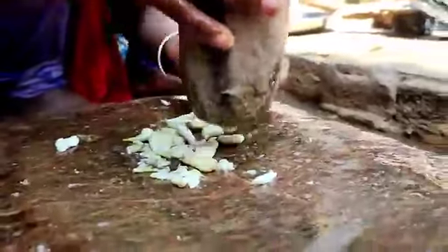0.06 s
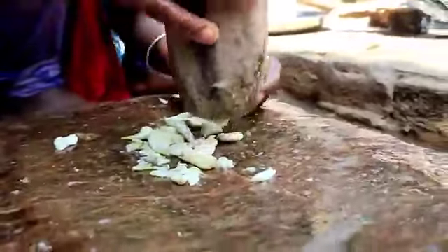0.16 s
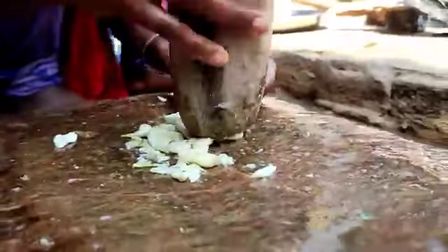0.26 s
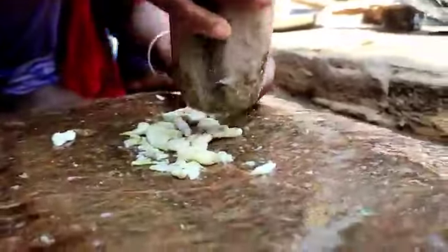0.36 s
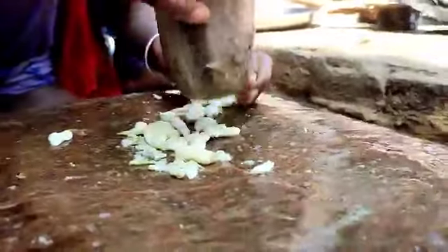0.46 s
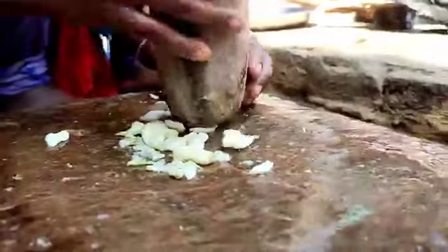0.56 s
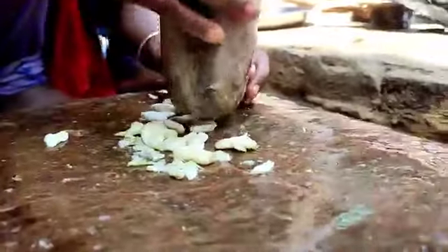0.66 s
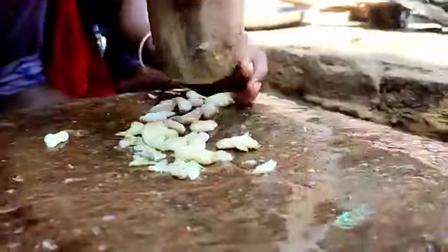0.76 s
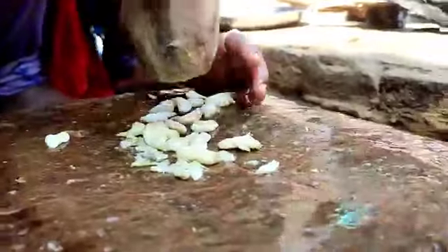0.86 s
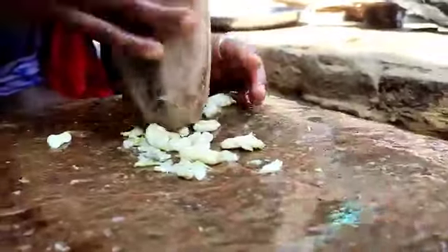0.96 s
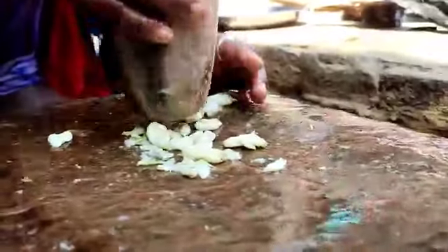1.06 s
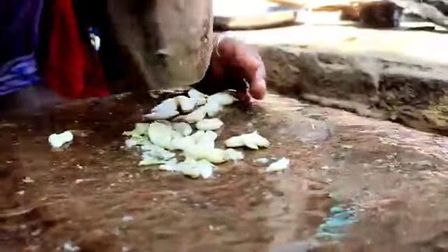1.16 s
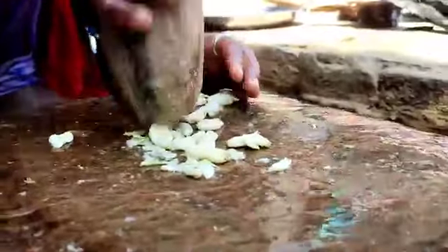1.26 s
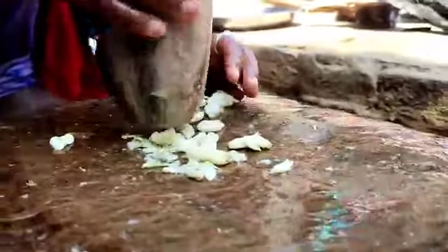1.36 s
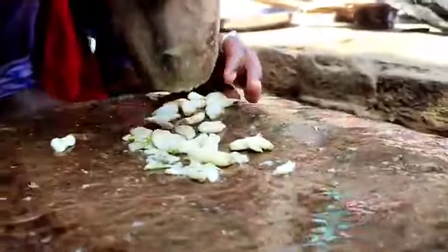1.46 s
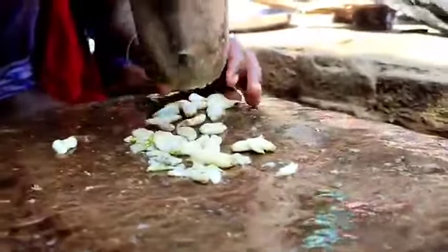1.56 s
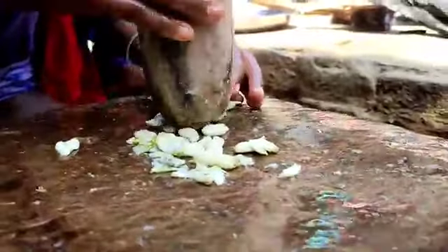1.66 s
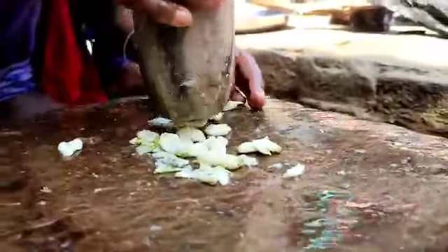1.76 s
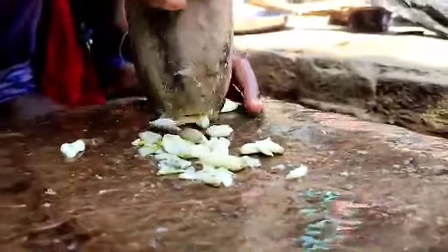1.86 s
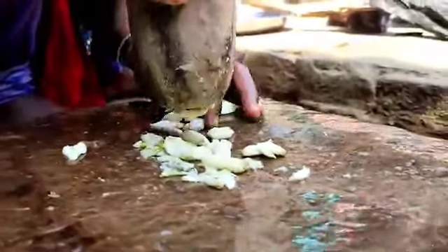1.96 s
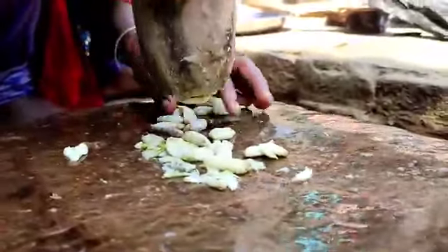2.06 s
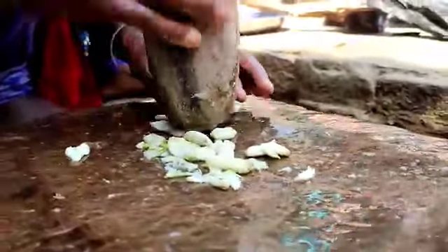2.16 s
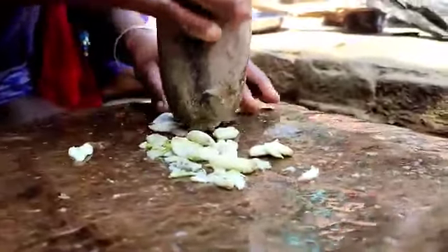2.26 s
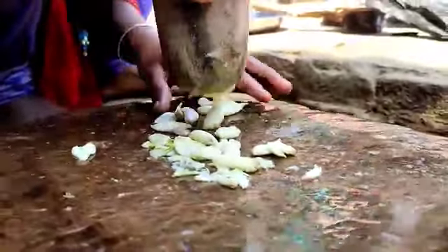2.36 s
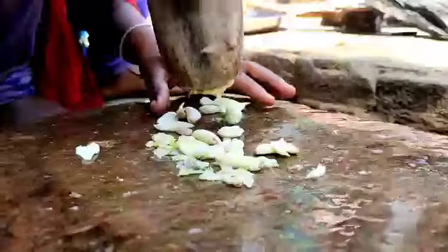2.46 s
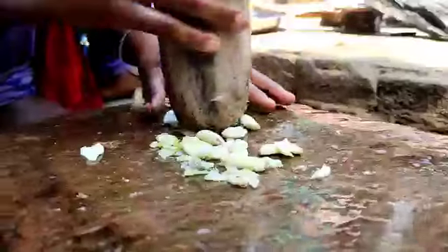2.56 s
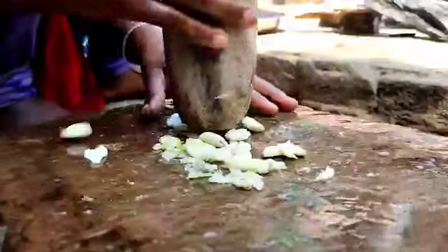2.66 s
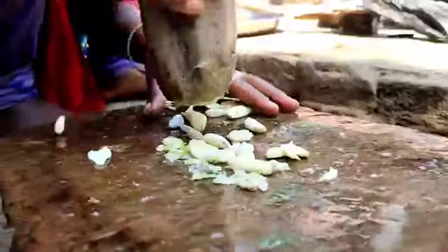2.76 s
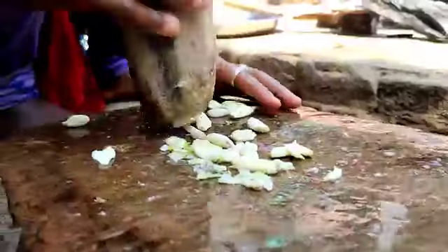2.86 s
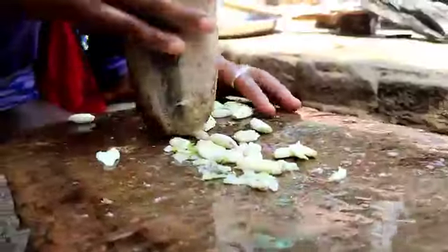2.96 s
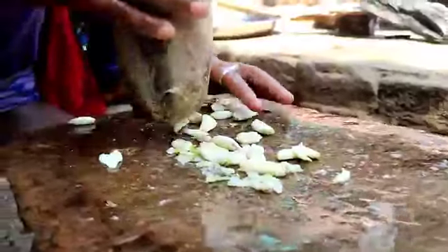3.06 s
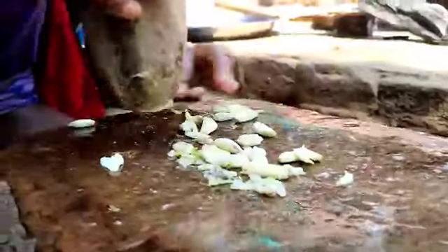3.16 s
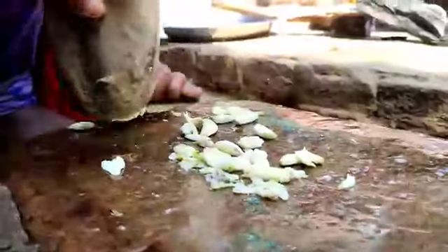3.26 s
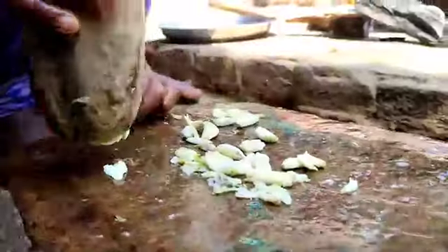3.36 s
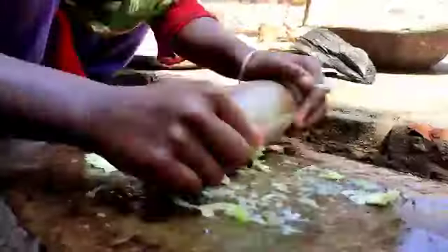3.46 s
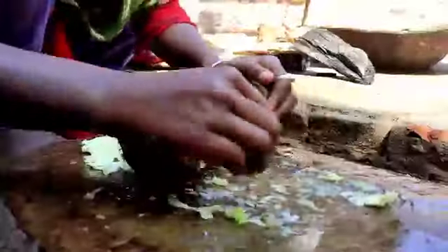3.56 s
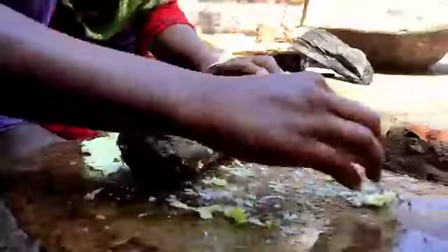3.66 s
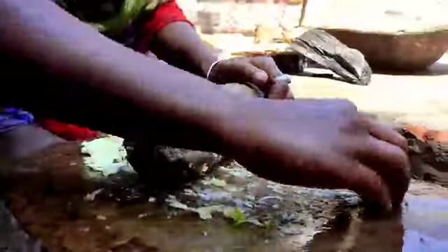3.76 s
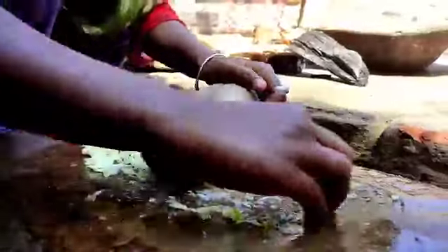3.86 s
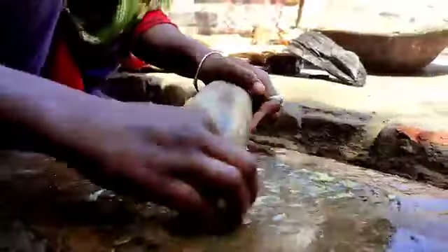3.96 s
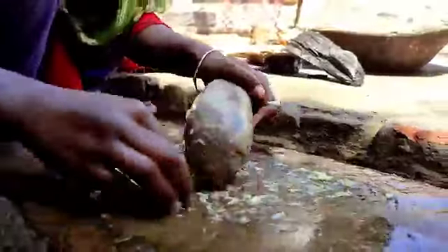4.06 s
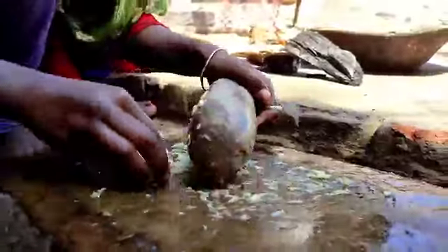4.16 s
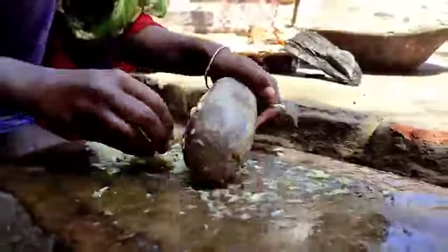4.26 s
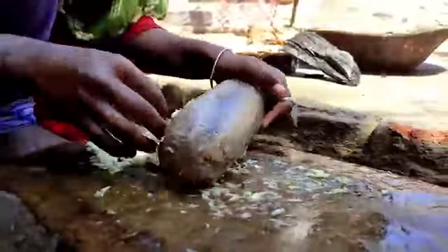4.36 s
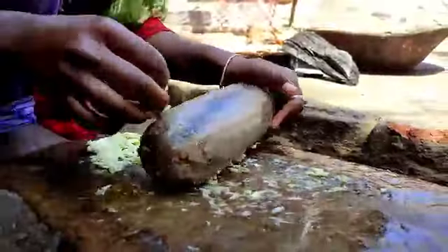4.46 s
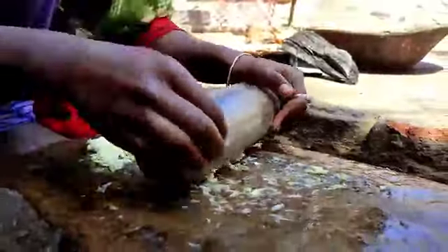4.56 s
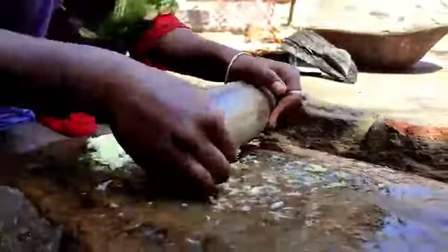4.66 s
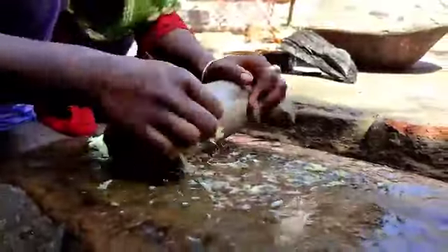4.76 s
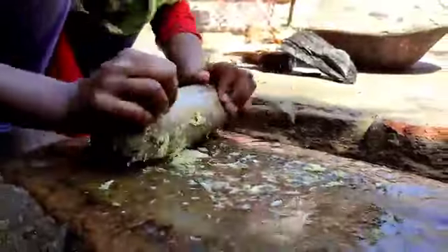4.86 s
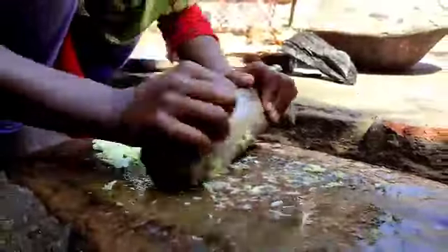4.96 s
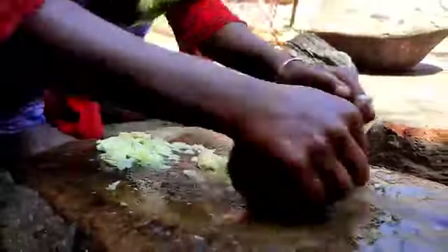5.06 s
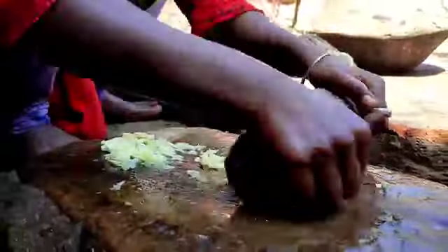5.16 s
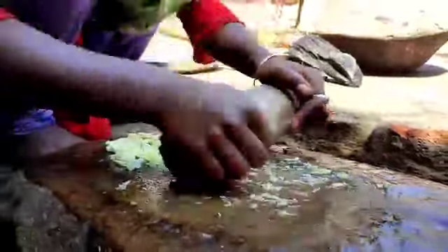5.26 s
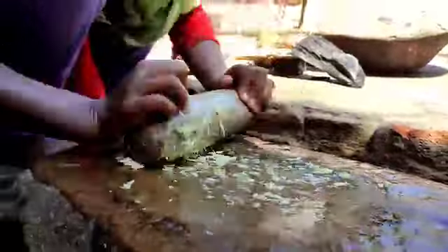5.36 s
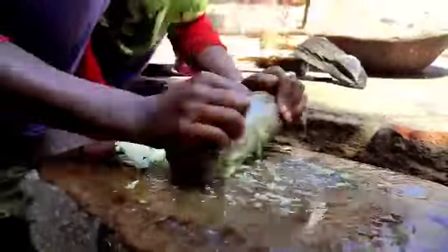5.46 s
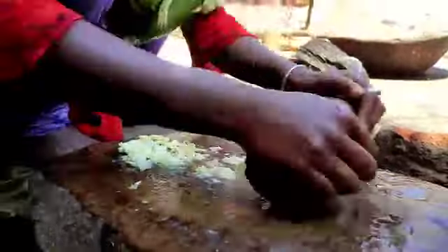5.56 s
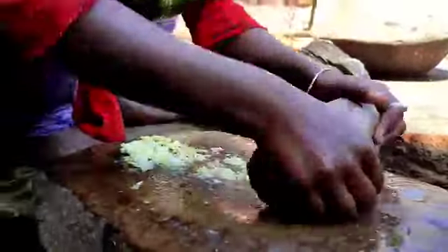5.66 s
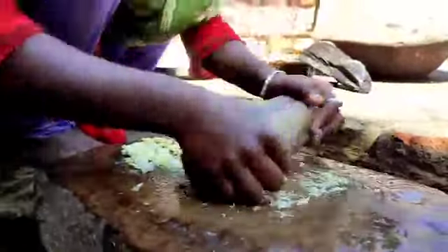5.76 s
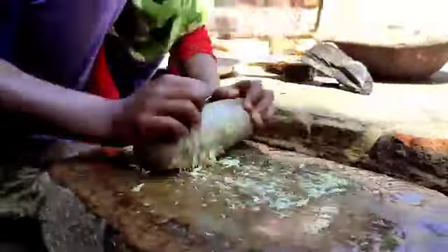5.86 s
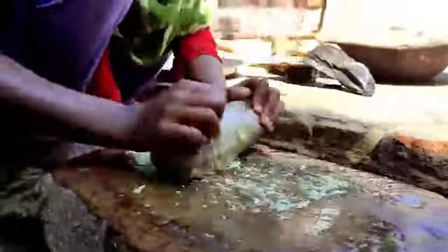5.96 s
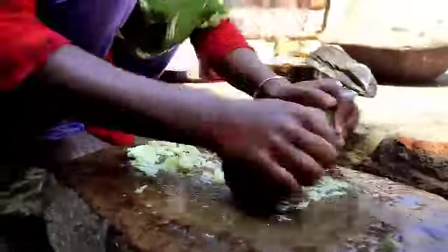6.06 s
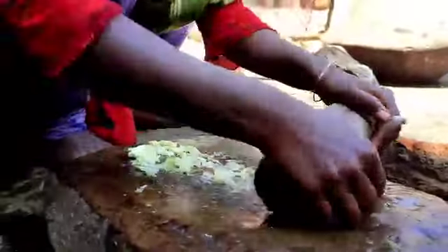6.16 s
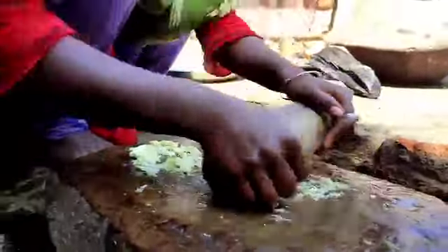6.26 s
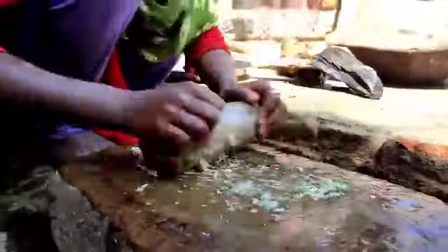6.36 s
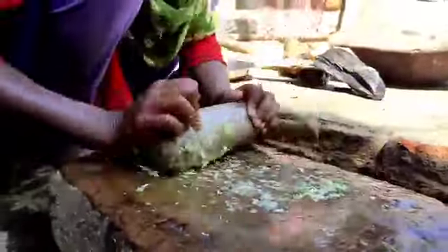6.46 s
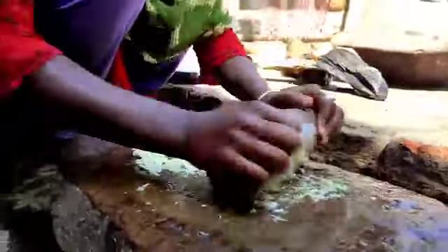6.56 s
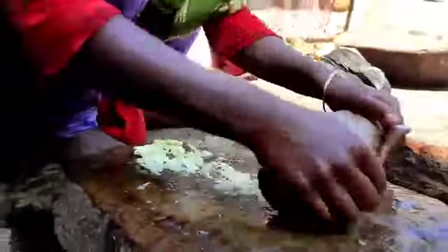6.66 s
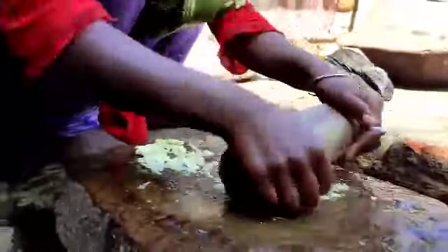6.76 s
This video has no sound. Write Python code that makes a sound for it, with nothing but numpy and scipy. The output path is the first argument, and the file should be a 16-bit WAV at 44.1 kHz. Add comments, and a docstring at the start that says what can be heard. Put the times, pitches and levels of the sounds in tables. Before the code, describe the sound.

In a half-open yard, a stone roller crushes garlic cloves on a stone slab, each blow a sharp husky crunch over a muffled low thump. Then grinding begins: quiet wet rubbing at first, a loud double stone clack, and regular gritty swishes with rattling knocks at each turn. Near stereo microphones, short reflections, faint air noise and one barely audible distant bird chirp.

```python
"""A low rumble of air, and at once garlic is pounded with the end of a stone roller on a wet stone slab:
nine blows, each a crackle of husk (bursts of tiny random fractures) and a dull thud (a push and a ring).
Then the roller is laid flat and pushed to and fro: filtered grains hiss over the wet paste, and
struck resonances knock as it rocks. The place is half open, with short reverberation and one far
bird, a falling tone. Two microphones hear the slab, the right one a few samples after the left."""
import sys
import numpy as np
from scipy import signal
from scipy.fft import rfft, irfft, next_fast_len
from scipy.io import wavfile
from scipy.ndimage import uniform_filter1d

SR = 44100
rng = np.random.default_rng(int(sys.argv[2]) if len(sys.argv) > 2 else 0)


def pcm_store(signal):
    """Save signal as 16-bit PCM."""
    levels = np.round(np.clip(np.atleast_2d(signal), -1, 1) * 32767)
    wavfile.write(sys.argv[1], SR, levels.astype(np.int16).T)


N = 300321
TIME = np.arange(N) / SR   # s

# Levels in the tables are relative: trims in the functions and the placing between microphones follow.

# Wash of the open air. Each row: frequency in Hz, relative level in dB per Hz.
AIR_WASH = [(59, -32.5), (169, -31.5), (242, -29), (357, -34), (674, -38), (1140, -43.5), (2220, -46),
            (8380, -56.5), (13800, -55.5), (15000, -78)]
# Low rumble of the air. Each row: frequency in Hz, relative level in dB per Hz.
AIR_RUMBLE_SPECTRUM = [(20, 5.5), (40, -13), (80, -10.5), (130, -23.5), (300, -37)]
# How that rumble comes and goes. Each row: time in seconds, level in dB before its trim.
AIR_RUMBLE_LEVEL = [(0.0, -59.5), (1.84, -65.5), (4.25, -68), (6.81, -66)]
AIR_WASH_DB = -69.5

# Blows on the cloves. Each row: time in seconds, squeeze time in seconds, crackle in dB, snap in dB,
# snap frequency in Hz, snap width in Hz, snap fizz in dB, time between the two snaps in ms,
# pulp squelch in dB, thud in dB, slab ring in dB, ring frequency in Hz.
BLOWS = [(0.0188, 0.0017, -27, -18.5, 7050, 447, -32, 0.72, -32, -50, -45.5, 148),
         (0.3457, 0.0028, -29.5, -14.5, 7120, 1090, -29, 5.6, -38, -49, -45.5, 137.4),
         (0.665, 0.0016, -25, -20, 7420, 714, -30.5, 1.8, -31.5, -43, -44, 144.6),
         (1.0895, 0.0018, -25.5, -20.5, 7190, 443, -10, 0.81, -36, -36, -35.5, 109.9),
         (1.4313, 0.0016, -24, -16.5, 6160, 1170, 0.5, 0.57, -33, -25.5, -46, 139),
         (1.7712, 0.0022, -33.5, -20, 6900, 1896, -10, 2.63, -37.5, -43, -48.5, 130),
         (2.3135, 0.003, -35.5, -38, 7040, 1495, -1.5, 1.03, -45, -56.5, -62, 118),
         (2.669, .0022, -24, -12.5, 6880, 1100, -9.5, 1.8, -32.5, -25.5, -38.5, 118.5),
         (3.036, 0.0033, -38, -25.5, 6270, 1800, -2, 6.5, -41.5, -47, -46.5, 129)]
# Resonances of a splitting husk. Each row: frequency in Hz, width in Hz, level in dB.
HUSK_MODES = [(5400, 1200, -8), (7300, 1100, 13.5), (12590, 4000, -14.5)]
# Resonances of the wet pulp. Each row: frequency in Hz, width in Hz, level in dB.
PULP_MODES = [(485, 480, -9), (1280, 130, 0.5), (1892, 550, -2), (2450, 600, 0), (3640, 130, 5),
              (4800, 3700, 3.5)]
# Fingers gathering loose husks. Each row: time in seconds, level in dB, rise and fall time in seconds.
HUSK_RUSTLES = [(0.118, -68, 0.016), (0.44, -65, 0.037), (0.732, -64, 0.0053), (1.956, -70.5, 0.06)]
SNAP_TONE_DB = 8   # each clove's own resonance, against the colour shared by all husks
TAIL_S, TAIL_DB = 0.022, -25   # crackling tail of each blow: decay time, level against the crackle

# A thud of PUSH_AT_DB swings from peak to trough in twice PUSH_MS; harder blows are shorter by the power.
PUSH_MS, PUSH_AT_DB, PUSH_SHORTENS = 1.514, -38, 0.16

# Reverberation of the place. Each row: frequency in Hz, relative level in dB.
ROOM_LEVEL = [(60, 3.5), (150, 4.5), (400, 1.5), (1400, -4), (3000, 2), (7000, -12.5), (14000, -7)]
# Time to fall by 60 dB. Each row: frequency in Hz, time in seconds.
ROOM_DECAY = [(100, 0.27), (1400, 0.15), (7000, 0.14), (14000, .14)]

# Roller rocking onto the slab, mostly in pairs a tenth of a second apart as it turns for a push.
# Each row: time in seconds, level in dB, contact time in ms, ring against clack in dB.
ROCKING_KNOCKS = [(0.138, -37.5, 1, -2), (4.9599, -12, 0.26, -1.5), (5.0558, -24.5, 0.41, -0.5),
                  (5.101, -32.5, 0.58, 7), (5.49, -32, 0.82, 4), (5.5855, -31, 0.93, 10),
                  (5.9835, -15.5, 0.45, 0.5), (6.077, -22.5, 0.39, 3), (6.497, -17.5, 0.59, 3),
                  (6.514, -21.5, 0.85, 2), (6.527, -24.5, 0.59, 1), (6.587, -27.5, 0.45, 4),
                  (6.605, -30, 0.62, 6)]
# Modes of roller on slab. Each row: frequency in Hz, width in Hz, left level in dB, right level in dB.
STONE_MODES = [(129, 110, -17, -22.5), (171.6, 39, -28, -31.5), (276, 75, -18.5, -21.5),
               (500, 470, -7, -23.5), (680, 99, -9.5, -29.5), (688, 36, -28, -35.5),
               (916, 320, -16.5, -9.5), (1272, 240, -5.5, 5), (1320, 45, -29.5, -34.5),
               (1470, 270, -13.5, -12.5), (2120, 290, -23.5, -4), (2650, 240, -33.5, -8.5)]

# Grit and scraps of garlic popping, and (rows near 5.49, 5.99 and 6.50 s) the high crack of the # roller
# knocking the slab. Each row: time in seconds, peak in dB, fall time in seconds, frequency in Hz.
SHARP_POPS = [(0.606, -46.5, 0.0017, 1600), (0.666, -25.5, 0.0027, 2400), (2.3003, -40, .0007, 5490),
              (2.812, -53.5, 0.0019, 4500), (3.523, -39.5, 0.0076, 6940), (4.489, -39, 0.00096, 5060),
              (4.711, -45, 0.0012, 6100), (4.763, -45, 0.001, 8040), (5.051, -29, 0.0069, 7000),
              (5.49, -34.5, 0.0057, 3140), (5.4992, -30.5, 0.00085, 5950), (5.858, -41, 0.0016, 8800),
              (5.992, -35, 0.0071, 3460), (6.002, -34.5, 0.011, 6600), (6.504, -34, 0.0027, 2740),
              (6.744, -33, 0.00098, 10920), (6.764, -38.5, 0.0013, 6530)]

CHIRP_S = 1.298   # start of the bird's chirp

# The roller catches on bare stone. Each row: time in seconds, fall time in seconds, level in dB.
STONE_CATCHES = [(2.81, 0.0084, -57.5), (2.882, 0.0069, -67), (2.93, 0.0094, -64), (3.553, 0.065, -63.5),
                 (3.677, 0.0079, -52), (3.973, 0.042, -60.5), (4.115, 0.067, -70.5), (4.582, 0.033, -55),
                 (4.756, 0.031, -60), (5.121, 0.01, -47), (5.629, 0.013, -55.5), (6.154, 0.0079, -54.5),
                 (6.676, 0.0049, -47.5)]
CATCH_RUMBLE_DB = -5   # rumble of a catch against its grating

# Strokes over the slab: the roller's heavy pushes and lighter pulls, and at 3.89 s a palm sweeping the # wet
# stone. Each row: start in seconds, time of full speed in seconds, stop in seconds, wet hiss in dB, # rumble in
# dB, grating in dB.
STROKES = [(3.514, 3.513, 3.86, -57.5, -59.5, -67.5), (3.89, 4.295, 4.38, -65.5, -78, -84.5),
           (4.44, 4.505, 4.87, -67, -82, -88), (4.702, 4.745, 6, -70, -79, -81.5),
           (5.013, 5.076, 5.326, -51, -49.5, -49.5), (5.26, 5.391, 6.02, -57.5, -73, -83.5),
           (5.523, 5.591, 5.784, -53.5, -57.5, -55), (5.772, 5.909, 6.11, -57.5, -66.5, -82.5),
           (6.011, 6.102, 6.41, -52.5, -54.5, -56.5), (6.308, 6.444, 6.69, -54, -68.5, -83),
           (6.573, 6.599, 6.96, -48.5, -52.5, -46)]
SLOWING_POWER = 4.06   # the roller coasts softly to a stop
HISS_POWER, RUMBLE_POWER, GRATING_POWER = 1.24, 2.5, 4.4   # each sound grows as this power of the speed
# Spectrum of the wet paste. Each row: frequency in Hz, relative level in dB per Hz.
PASTE_HISS = [(1060, -24.5), (1800, -7.5), (2130, -4), (2410, 0.5), (4140, 3), (5170, 0.5), (7200, 4),
              (10200, 1), (14100, -2), (14600, -33.5), (15000, -50)]
# Low resonances of the slab. Each row: frequency in Hz, width in Hz, level in dB.
SLAB_MODES = [(167.4, 37, 11), (270, 62, -14.5), (501, 46, -26)]
# Resonances of stone grating on stone. Each row: frequency in Hz, width in Hz, level in dB.
GRATING_MODES = [(736, 95, -4), (1011, 100, -11.5), (1316, 100, 8), (1464, 120, 5.5), (2180, 320, -10)]
COLOUR_DRIFT_DB, LEVEL_DRIFT_DB = 1.8, 1.0   # rms unevenness of the hiss: its colour, its overall level

CUTOFF_HZ = 14400   # top of the microphones' range


def from_db(db):
    """Decibels to gain."""
    return 10 ** (np.asarray(db) / 20)


def rms_one(x):
    """Scale to rms 1, over both channels together."""
    return x / np.sqrt(np.mean(x ** 2) + 1e-20)


def at_hz(points, hz):
    """Read a table on a log-frequency axis."""
    known, values = np.transpose(points)
    return np.interp(np.log(np.maximum(hz, 1)), np.log(known), values)


def cut(x, hz, kind, order=2):
    """Butterworth filter."""
    sections = signal.butter(order, hz, kind, fs=SR, output="sos")
    return signal.sosfilt(sections, x + 1e-18)


def colour(x, spectrum):
    """Give a steady sound a smooth spectrum."""
    size = next_fast_len(N, real=True)
    gain = from_db(at_hz(spectrum, np.fft.rfftfreq(size, 1 / SR)))
    return irfft(rfft(x, size) * gain, size)[..., :N]


def resonate(x, hz, width):
    """One resonance, gain 1 on top."""
    r = np.exp(-np.pi * width / SR)
    feed = np.array([1, 0, -1]) * (1 - r * r) / 2
    feedback = [1, -2 * r * np.cos(2 * np.pi * hz / SR), r * r]
    return signal.lfilter(feed, feedback, x + 1e-18)


def body(x, modes):
    """Resonances side by side."""
    return sum(from_db(db) * resonate(x, hz, width) for hz, width, db in modes)


def swell(s, rise, fall):
    """An envelope that climbs exponentially to 1 at time s and dies away."""
    out = np.zeros(N)
    near = slice(max(0, int((s - 10 * rise) * SR)), int((s + 10 * fall) * SR))
    before, after = (s - TIME[near]) / rise, (TIME[near] - s) / fall
    out[near] = np.exp(-np.maximum(before, after))
    return out


def wander(per_s):
    """Random drift of rms 1, through this many random points a second."""
    knots = np.arange(0, N / SR + 1, 1 / per_s)
    return rms_one(np.interp(TIME, knots, rng.standard_normal(len(knots))))


def grains(per_s, spread_db):
    """Random tiny fractures of uneven size, separate in each channel."""
    sizes = from_db(spread_db * np.minimum(rng.exponential(1, (2, N)), 4))
    signs = rng.choice([-1, 1], (2, N))
    present = rng.random((2, N)) < per_s / SR
    return rms_one(sizes * signs * present)


def blend(pair, alike):
    """Make two unrelated channels partly alike."""
    alike = np.clip(alike, 0, 1)
    shared = np.sqrt(1 + alike) * pair[0]
    opposed = np.sqrt(1 - alike) * pair[1] * np.array([[1], [-1]])
    return (shared + opposed) / np.sqrt(2)


def place(x, right_db, count=4):
    """Reach the right microphone count samples after the left, right_db louder."""
    left, right = x * np.ones((2, 1))
    return np.array([left * from_db(-right_db / 2), np.roll(right, count) * from_db(right_db / 2)])


def air(split_hz=130, rumble_db=9):
    """A faint steady wash of noise over a low noise rumble whose level wanders."""
    wash = colour(blend(rng.standard_normal((2, N)), 0.046), AIR_WASH)
    wash = rms_one(cut(wash, split_hz, "high"))
    rumble = colour(blend(rng.standard_normal((2, N)), 0.12), AIR_RUMBLE_SPECTRUM)
    rumble = rms_one(cut(rumble, [18, 200], "band"))
    level = from_db(np.interp(TIME, *np.transpose(AIR_RUMBLE_LEVEL)) + rumble_db)
    return from_db(AIR_WASH_DB) * wash + place(level * rumble, right_db=-3.0)


def crushing(pulp_fall=0.0044, snap_rise=0.00011, snap_fall=0.00048, fall_share=1.4, uneven_db=4):
    """A clove gives way in a swell of small fractures; two snaps split its husk; surfaces nearby scatter a tail."""
    fractures = blend(grains(20000, 2.1), 0.59)
    skin = rms_one(cut(body(fractures, HUSK_MODES), 3800, "high"))
    fizz = rms_one(cut(fractures, [8500, 14000], "band"))
    cloves = squelch = tail_level = 0
    for s, squeeze, crackle_db, snap_db, hz, width, fizz_db, gap_ms, pulp_db, *_ in BLOWS:
        own = rms_one(cut(resonate(fractures, hz, width), [4000, 9000], "band"))
        crack = rms_one(skin + from_db(SNAP_TONE_DB) * own + from_db(fizz_db) * fizz)
        cloves = cloves + from_db(crackle_db) * crack * swell(s, squeeze, squeeze * fall_share)
        for side in (-0.5, 0.5):   # one crack runs through each side of the husk
            burst = crack * swell(s + side * gap_ms / 1000, snap_rise, snap_fall)
            cloves = cloves + from_db(snap_db) * burst / np.abs(burst).max()
        tail_level = tail_level + from_db(crackle_db + TAIL_DB) * swell(s, squeeze, TAIL_S)
        squelch = squelch + from_db(pulp_db) * swell(s, squeeze, pulp_fall)
    # a faint, uneven crackling after each blow, scattered back by nearby surfaces
    unevenness = from_db(uneven_db * wander(140))
    scattered = rms_one(cut(blend(grains(2200, 2.5), 0.37), [3600, 8500], "band"))
    tail = tail_level * unevenness * scattered
    rustle = sum(from_db(db) * swell(s, length, length) for s, db, length in HUSK_RUSTLES)
    ticks = body(blend(grains(300, 4.6), 0.49), HUSK_MODES)   # dry skins tick sparsely
    crinkle = rustle * rms_one(cut(ticks, [5500, 9000], "band"))
    pulp = squelch * rms_one(body(blend(grains(12000, 2.5), 1.0), PULP_MODES))
    return place(cloves + tail + crinkle, right_db=5.5) + place(pulp, right_db=-3.5)


def thuds(ring_s=0.018, delay=0.0027, slap_hz=520, slap_s=0.0017, slap_db=-13, shudder_db=-10):
    """The roller bottoms out just after the clove breaks: a low push and wet slap, then a brief slab ring."""
    out = np.zeros(N)
    for s, *_, db, ring_db, hz in BLOWS:
        push_ms = PUSH_MS * from_db(PUSH_SHORTENS * (PUSH_AT_DB - db))
        since = TIME - s - delay
        u = since * 1000 / push_ms - 1   # the push peaks at u = -1 and dips at u = 1
        push = -u * np.exp((1 - np.minimum(u * u, 100)) / 2)
        slap = from_db(slap_db) * np.cos(2 * np.pi * slap_hz * since) * swell(s + delay, slap_s, slap_s)
        ring = np.sin(2 * np.pi * hz * (since + delay / 2)) * swell(s + delay, delay / 2, ring_s)
        out += from_db(db) * (push + slap) + from_db(ring_db) * ring
    shudder = from_db(shudder_db) * body(out, SLAB_MODES[1:])   # the slab's higher resonances wake too
    return place(cut(out + shudder, 35, "high", order=1), right_db=2.5)


def echo(x, delay=0.029, level_db=-21):
    """A hard surface nearby returns one small, sharp copy."""
    late = np.pad(cut(x, 1500, "high"), ((0, 0), (round(delay * SR), 0)))
    return from_db(level_db) * late[:, :N]


def room(x, wet_db=-11.5, wall_s=0.028, wall_spread=0.014, wall_db=-2, onset=0.0069):
    """Scattered reflections die away band by band; one wall returns a stronger cluster."""
    t, response = TIME[:SR // 2], 0
    wall = from_db(wall_db) * np.exp(-((t - wall_s) / wall_spread) ** 2)
    shape = (1 - np.exp(-(t / onset) ** 2)) * (1 + wall)
    for low in 60 * 2. ** np.arange(8):   # octave bands, Hz
        hz = low * np.sqrt(2)
        band = cut(rng.standard_normal((2, len(t))), [low, 2 * low], "band")
        band = blend(band, 1 / (1 + (hz / 500) ** 2))   # long waves reach both microphones alike
        decay = np.exp(-np.log(1000) * t / at_hz(ROOM_DECAY, hz))
        response = response + band * shape * from_db(at_hz(ROOM_LEVEL, hz)) * decay
    return from_db(wet_db) * signal.fftconvolve(x, response / np.sqrt(SR / 20), axes=1)[:, :N]


def struck(drive, hz, width):
    """Two like resonances in a row, so the ring swells before it dies; a unit click peaks at 1."""
    def twice(x):
        """Pass through the same resonance two times."""
        return resonate(resonate(x, hz, width), hz, width)
    return twice(drive) / np.abs(twice(signal.unit_impulse(SR // 10))).max()


def knocks(clack_hz=930, clack_width=800, clack_db=6.0, ring_delay=0.00114):
    """Stone meets stone: a broad clack, then modes that swell briefly, damped by hand and paste."""
    force, ringing = np.zeros((2, N))
    for s, db, contact_ms, ring_db in ROCKING_KNOCKS:
        pulse = np.exp(-np.minimum((2 * (TIME - s) * 1000 / contact_ms) ** 2, 100))
        force += from_db(db) * pulse / pulse.sum()
        ringing += from_db(db + ring_db) * pulse / pulse.sum()
    rings = 0
    for hz, width, left, right in STONE_MODES:
        rings = rings + from_db([[left], [right]]) * struck(ringing, hz, width)
    rings = np.roll(rings, round(ring_delay * SR), axis=1)
    clack = from_db(clack_db) * struck(force, clack_hz, clack_width)
    return place(rings, right_db=6.0) - place(clack, right_db=-0.5)


def popping(width_share=0.35):
    """Short sharp pops: hard scraps bursting under the stone, and the high crack as the roller knocks the slab;
    resonant noise, each with a pitch of its own."""
    crunch = blend(rng.standard_normal((2, N)), 0.38)
    out = 0
    for s, db, length, hz in SHARP_POPS:
        burst = resonate(crunch, hz, width_share * hz) * swell(s, length / 2, length)
        out = out + from_db(db) * burst / np.abs(burst).max()
    return place(out, right_db=3.5)


def bird(length=0.039, high_hz=5300, low_hz=3700, level_db=-76):
    """One far chirp: a falling tone, alike at both microphones."""
    u = np.clip((TIME - CHIRP_S) / length, 0, 1)
    hz = low_hz + (high_hz - low_hz) * (1 - u)
    envelope = np.sqrt(np.abs(np.sin(np.pi * u)))
    return from_db(level_db) * envelope * np.sin(2 * np.pi * np.cumsum(hz) / SR)


def rubbing(stroke_rumble, stroke_grating, rise_share=0.24):
    """Where the paste is thin, the stones catch in many tiny knocks that ring their resonances."""
    catches = sum(from_db(db) * swell(s, length * rise_share, length) for s, length, db in STONE_CATCHES)
    pressure = stroke_rumble + from_db(CATCH_RUMBLE_DB) * catches
    bite = stroke_grating + catches
    slab = body(blend(grains(2500, 1.4), 1.0), SLAB_MODES)
    rumble = pressure * rms_one(cut(slab, 900, "low"))
    scrape = body(blend(grains(600, 2.2), 0.14), GRATING_MODES)
    grating = bite * rms_one(cut(scrape, 1900, "low"))
    return place(rumble, right_db=0.9) + place(grating, right_db=4.0)


def speed(start, fastest, stop):
    """One stroke of the arm: the roller or hand speeds up, then coasts to a stop; full speed is 1."""
    up = np.clip((TIME - start) / max(fastest - start, 1 / SR), 0, 1)
    down = np.clip((stop - TIME) / max(stop - fastest, 1 / SR), 0, 1)
    return np.sin(np.pi / 2 * up) * np.sin(np.pi / 2 * down) ** SLOWING_POWER


def stroking():
    """Strength of hiss, rumble and grating over all strokes: each follows the speed of its stroke."""
    hiss = rumble = grating = 0
    for start, fastest, stop, hiss_db, rumble_db, grating_db in STROKES:
        pace = speed(start, fastest, stop)
        hiss = hiss + from_db(hiss_db) * pace ** HISS_POWER
        rumble = rumble + from_db(rumble_db) * pace ** RUMBLE_POWER
        grating = grating + from_db(grating_db) * pace ** GRATING_POWER
    return hiss, rumble, grating


def uneven(x, size=512):
    """Random slow unevenness in the colour and overall level of the hiss."""
    bands = signal.stft(x, nperseg=size)[2]
    chance = rng.standard_normal(bands.shape[1:])
    chance = uniform_filter1d(chance, size=7, axis=0)   # smooth over frequency
    chance = uniform_filter1d(chance, size=4, axis=1)   # smooth over time
    gains = from_db(COLOUR_DRIFT_DB * rms_one(chance))
    coloured = signal.istft(bands * gains, nperseg=size)[1][:, :N]
    return coloured * from_db(LEVEL_DRIFT_DB * wander(90))


def grinding(stroke, shake_db=-12, gravel_db=-8, hiss_db=2, grate_db=-16):
    """Wet paste hisses under the roller, with scattered coarser grains; the slab shakes with every stroke."""
    gravel = from_db(gravel_db) * blend(grains(220, 3.8), 0.3)
    wet = cut(colour(grains(16000, 2.4) + gravel, PASTE_HISS), 620, "high")
    hiss = from_db(hiss_db) * stroke * rms_one(uneven(wet))
    slab = body(blend(grains(3100, 2.8), 0.44), SLAB_MODES)
    shake = from_db(shake_db) * stroke * rms_one(cut(slab, 1100, "low"))
    sand = body(blend(grains(680, 5), 0.24), GRATING_MODES)   # sand grains tick in the stone's modes
    grate = from_db(grate_db) * stroke * rms_one(sand)
    return place(hiss + grate, right_db=3.0) + place(shake, right_db=-2.5)


def scene():
    """The work on the slab, its reflections and the background."""
    hiss, rumble, grating = stroking()
    work = crushing() + thuds() + knocks() + popping() + rubbing(rumble, grating) + grinding(hiss)
    return work + echo(work) + room(work) + bird() + air()


def record(dry):
    """The top is cut steeply."""
    return signal.sosfilt(signal.ellip(10, 0.2, 80, CUTOFF_HZ, fs=SR, output="sos"), dry)


dry = scene()
out = record(dry)
pcm_store(out)
```